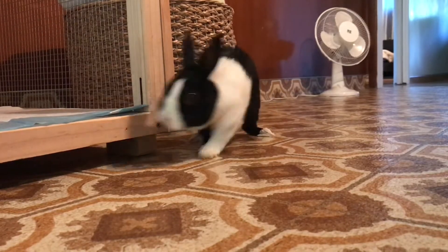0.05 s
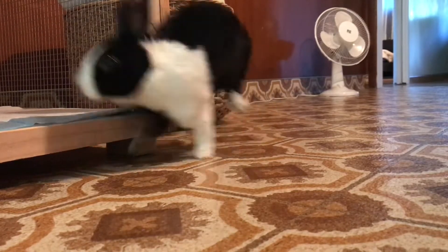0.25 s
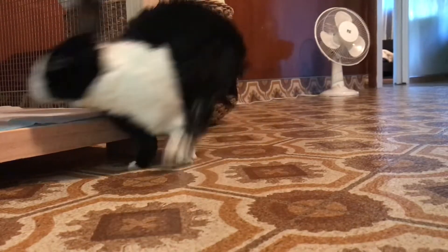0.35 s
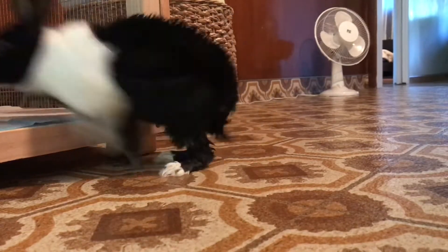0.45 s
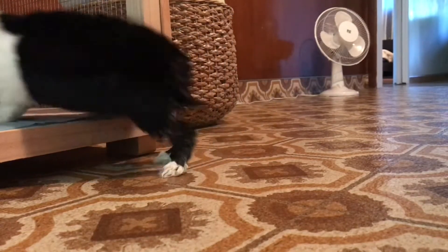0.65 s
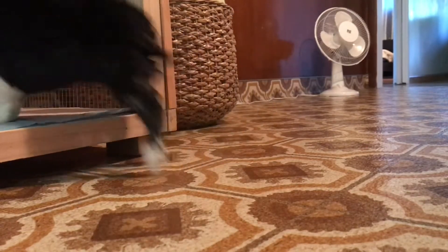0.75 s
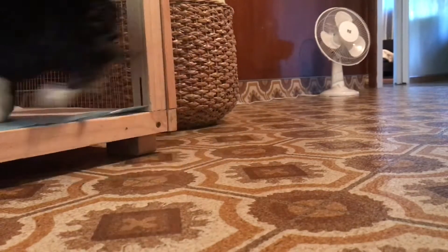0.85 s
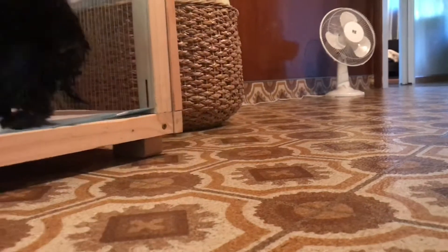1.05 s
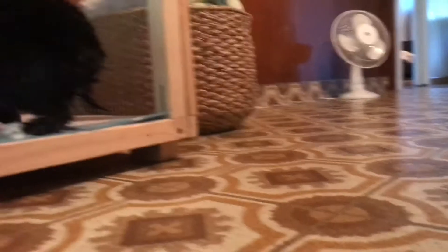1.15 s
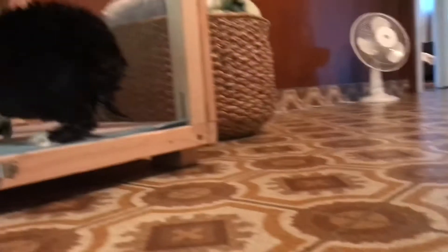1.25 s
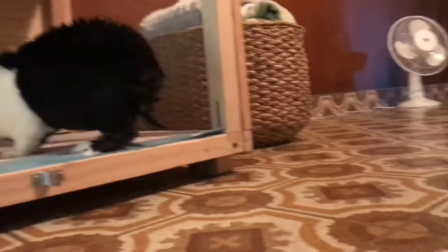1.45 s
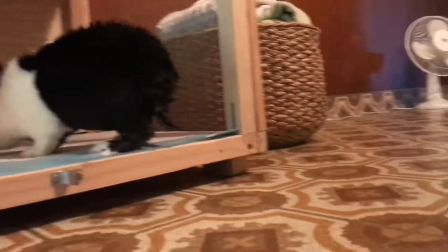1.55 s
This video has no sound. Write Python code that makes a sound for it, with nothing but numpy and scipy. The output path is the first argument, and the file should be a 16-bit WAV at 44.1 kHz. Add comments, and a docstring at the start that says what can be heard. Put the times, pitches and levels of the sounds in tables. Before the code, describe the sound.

Rabbit claws on hard tile, heard close in a small reflective room: faint scrapes at first, a crisp tick at 0.2 seconds, and the loudest bright crack at 0.3. Lighter ticks, scrapes and soft low paw thumps continue to 0.7. A clustered woody knock on the pen comes near 0.87, then smaller knocks around 1.26-1.3, fading into quiet hiss, rumble and faint hum.

```python
"""A rabbit's claws tick and scrape on hard tiles, close to the microphone, as it hops into its wooden pen.
Ticks, scrapes and the loudest strike's bright grit are short noise contacts with a claw-on-tile spectrum;
ticks add a brief ring. Feet knock the pen's frame, exciting dry wood and decaying modes; soft pads land as
swelling low sines with a dull patter. A small live room answers claws and knocks with reflections and a tail.
Below lie shaped-noise hiss and rumble that ease off, and a faint wavering hum that grows."""
import sys
import numpy as np
from scipy import signal
from scipy.fft import rfft, irfft
from scipy.io import wavfile

SR = 44100
rng = np.random.default_rng(int(sys.argv[2]) if len(sys.argv) > 2 else 0)


def transcribe(signal):
    """Save signal, clipped to [-1, 1], as a 16-bit WAV file at the path in sys.argv[1]."""
    frames = np.atleast_2d(signal).T
    limited = np.clip(frames, -1, 1)
    pcm = np.round(limited * 32767).astype(np.int16)
    wavfile.write(sys.argv[1], SR, pcm)


N = 70560  # length in samples

# Claw strikes on tile: start_s, level_db, contact_s, brightness_db_per_octave, room_send_db
CLAW_TICKS = [(.1782, -29, 0.00022, -11, 3), (0.2197, -16, 0.00072, -4.5, -5),
              (0.2206, -14.5, 0.00018, 4.5, 0.5), (0.3043, 1.5, 0.00021, -3.5, -0.5),
              (0.3558, -17, 0.000057, -3.5, -0.5), (.4280, -28, .0004, -11, 1),
              (0.611, -31, 0.00019, 1.5, 2.5), (1.311, -37, .0008, 7, 5), (1.3585, -37.5, 0.0016, 9, -1)]
# Claws dragging on tile, the bright grit of the loudest strike, and a brief rustle of fur near 0.7 s: #
# start_s, level_db, length_s, brightness_db_per_octave, rasp_hz, room_send_db
SCRAPES_GRIT_AND_RUSTLE = [(.002, -31, 0.028, 5.5, 4300, 4), (0.142, -30.5, 0.02, 4, 2760, 10.5),
                           (0.2208, -15.5, 0.0076, 2.5, 6360, -3), (0.241, -32, 0.014, -5, 6100, -3),
                           (0.3011, -8.5, 0.0024, .5, 1900, 2), (0.3052, -14.5, 0.004, 3.5, 8500, 8),
                           (0.411, -27, 0.019, 3.5, 12900, 7), (0.4736, -18.5, 0.01, 0, 7750, 1),
                           (.504, -30.5, 0.013, 1.5, 12030, -14), (0.612, -31.5, 0.012, 1.5, 4560, 4.5),
                           (0.675, -27, 0.0075, 4, 3400, -0.5), (0.698, -37, 0.016, 7, 4970, -5),
                           (0.833, -38, 0.028, 6, 2850, -6.5), (0.867, -22, 0.031, -0.5, 12900, 8.5),
                           (1.2568, -29.5, 0.0063, -1.5, 9000, 9), (1.318, -33, 0.023, 3.5, 12800, -2),
                           (1.487, -41, 0.013, 6.5, 12000, -1)]
# Spectrum of claw on tile: frequency_hz, level_db
CLAW_SPECTRUM = [(100, -41.5), (600, -27.5), (850, -30.5), (1300, -23), (1900, -9.5), (2600, -0.5),
                 (3250, -3), (3900, -8.5), (4750, -17), (5400, -11.5), (6250, -13), (7100, -20),
                 (8000, -19.5), (9900, -21.5), (10600, -23.5), (14200, -20.5), (16000, -35)]
# Brief ring within each tick: pitch_hz, level_db, t60_s
CLAW_MODES = [(3260, -25, 0.02), (3390, -36.5, 0.0067), (6100, -41, 0.018)]

# Feet on the pen's frame: start_s, level_db, contact_s, brightness_db_per_octave, spot_hz, ring_db, room_send_db
FRAME_KNOCKS = [(0.1788, -29, 0.0019, -3.5, 400, -4, -1.5), (.3830, -27.5, 0.0041, 3, 1500, -13, 9.5),
                (0.4698, -24.5, 0.01, -2, 400, -2.5, 8), (.6122, -24, 0.00043, -2, 1430, -17, 2.5),
                (.8692, -17.5, 0.00452, 1, 2300, -2.5, 4), (0.8725, -17, 0.0045, 2.3, 4430, -5.5, -0.5),
                (0.8777, -22.5, 0.0073, -1.5, 660, -5.5, -3), (0.8895, -24.5, 0.0065, 0, 700, -10, -8),
                (0.911, -29.5, 0.0067, -3, 2300, -8, 2), (0.938, -37, .012, 4, 2000, -4, -1),
                (1.139, -36.5, 0.0033, -6.5, 500, -4, -7), (1.258, -25, 0.0098, -1.5, 1000, -6, 5),
                (1.2962, -18.5, 0.002, -5.5, 710, -18, -10)]
# Spectrum of the frame's dry knock: frequency_hz, level_db
WOOD_SPECTRUM = [(60, -16), (300, 3), (700, 0.5), (1100, 2.5), (2200, 1.5), (3200, -11), (4400, -3),
                 (6200, -6.5), (8000, -19), (16000, -35)]
# Ringing modes of the frame: pitch_hz, level_db, t60_s
FRAME_MODES = [(415, -5.5, .11), (619, -8, 0.048), (657.5, 1, 0.13), (933.7, -4, 0.13), (1075, -6.5, 0.068),
               (1323, -5, 0.11), (1590, -5.5, .09), (1690, -2, .08), (2114, -13, .07), (2467, -13.5, .09),
               (4230, -1.5, 0.019), (5300, -16.5, .06), (5870, -21, .06)]
FRAME_RING_DB = -30  # each knock's ring_db adds to this
SPOT_DB, SPOT_OCTAVES = 6.5, 0.42  # lift and width of the peak at a rasp or spot pitch

# Soft pads landing: start_s, level_db, pitch_hz, rise_s, t60_s
PAD_THUMPS = [(.003, -41, 55.6, 0.013, 0.067), (0.147, -47, 58, 0.008, 0.11),
              (.245, -39, 48.7, 0.015, 0.47), (0.302, -38.5, 185.6, 0.011, 0.13),
              (.305, -45, 81, 0.022, 0.19), (.365, -37, 47.6, .015, 0.15), (.420, -39.5, 50.8, .02, 0.9),
              (0.496, -32, 95.4, .04, 0.18), (0.554, -37.5, 126, 0.0097, 0.083),
              (.570, -40, 48.8, .015, 0.28), (.660, -47.5, 203.3, 0.018, 0.2),
              (0.734, -44.5, 66, 0.0082, 0.25), (0.904, -40, 91.9, 0.015, 0.27),
              (0.938, -38.5, 55.8, 0.018, .25), (1.010, -43, 52, 0.015, .15),
              (1.024, -46.5, 146, 0.0093, 0.094), (1.315, -45, 65.6, 0.0059, .12),
              (1.335, -50.5, 169.8, 0.011, 0.17)]
# Spectrum of the pads' dull patter: frequency_hz, level_db
PAD_SPECTRUM = [(25, -36), (50, -1.5), (110, 2), (200, -1), (300, -12.5), (600, -22.5), (2000, -45)]
PATTER_DB = -11  # patter noise against the boom

# Room decay by band: centre_hz, t60_s
ROOM_DECAY = [(200, 0.77), (900, 0.43), (3200, 0.3657), (6000, 0.4), (14000, 0.27)]
# Colour of the room's tail: frequency_hz, level_db
ROOM_SPECTRUM = [(100, 2), (1000, 0.5), (1800, -1), (2300, -4), (2900, -2), (3550, 0.5), (4400, 2),
                 (6000, 1), (9000, 2), (15000, 1.5)]
TAIL_DB, TAIL_ONSET_S = -7.5, 0.0026
EARLY_DB, EARLY_PEAK_S = -14.5, 0.0027

# Spectrum of the room hiss, before its gentle low cut: frequency_hz, level_db
HISS_SPECTRUM = [(220, -33), (380, -1.5), (865, -4.5), (1200, -6.5), (1770, -11.5), (1910, -11),
                 (15500, -27.5)]
HISS_DB, HISS_FALL_DB_PER_S = -61.5, 3.5
# Spectrum of the low rumble: frequency_hz, level_db
RUMBLE_SPECTRUM = [(20, -24.5), (32, -22.5), (48, 6), (70, -2.5), (100, -3), (150, -4), (210, -6.5),
                   (280, -17), (340, -14), (420, -26), (700, -44)]
RUMBLE_DB, RUMBLE_FALL_DB_PER_S = -48.5, 3
# Faint hum, levels at the start: pitch_hz, level_db
HUM_TONES = [(721, -86), (1227, -82), (1556, -87.5), (1846, -88.5)]
HUM_WIDTH_HZ, HUM_RISE_DB_PER_S = 9, 4

LOW_CUT_HZ, TOP_HZ = 36, 15900  # the microphone's band edges


def undb(db):
    """Decibels to gain."""
    return 10 ** (np.asarray(db) / 20)


def unit(x):
    """Scale to an energy of one."""
    return x / np.sqrt(np.sum(x ** 2) + 1e-18)


def on_log_axis(points, hz):
    """Join (Hz, value) points by straight lines over log frequency."""
    p = np.array(points, float)
    return np.interp(np.log(np.maximum(hz, 1)), np.log(p[:, 0]), p[:, 1])


def response(points, tilt_db=0, spot_hz=None, size=8192):
    """Minimum-phase impulse response of unit energy: a spectrum, tilted above 400 Hz, lifted at one spot."""
    hz = np.maximum(np.fft.rfftfreq(size, 1 / SR), 10)
    db = on_log_axis(points, hz) + tilt_db * np.log2(np.maximum(hz, 400))
    if spot_hz:
        octaves_away = np.log2(hz / spot_hz)
        db = db + SPOT_DB * np.exp(-(octaves_away / SPOT_OCTAVES) ** 2)
    # folding the cepstrum onto positive time puts the energy up front
    cepstrum = irfft(db * np.log(10) / 20)
    cepstrum[1:size // 2] *= 2
    cepstrum[size // 2 + 1:] = 0
    return unit(irfft(np.exp(rfft(cepstrum))))


def through(x, ir):
    """Pass a sound through an impulse response, keeping its length."""
    return signal.fftconvolve(x, ir)[:len(x)]


def add(out, start_s, x):
    """Mix x into out from a start time."""
    i = max(int(start_s * SR), 0)
    out[i:i + len(x)] += x[:N - i]


def even_noise(shape, count=4):
    """Unit-energy noise under an envelope, repeatedly flattened so that it favours almost no frequency."""
    x = rng.standard_normal(len(shape)) * shape
    for _ in range(count):
        flat = irfft(np.exp(1j * np.angle(rfft(x))))
        x = flat * np.sqrt(shape / shape.max())
    return unit(x)


def contact(length_s, size=4096):
    """A run of tiny slips, as noise that dies away over the contact."""
    t = np.arange(size) / SR
    return even_noise(np.exp(-(t / length_s) ** 2))


def ringing(modes):
    """The modes of a struck object, as exponentially decaying sines."""
    t = np.arange(SR // 2) / SR
    return sum(undb(db - 60 * t / t60) * np.sin(2 * np.pi * hz * t) for hz, db, t60 in modes)


def claws():
    """Strikes excite a brief ring; scrapes and grit are noise peaked at one pitch; returns direct and send."""
    direct, send = np.zeros(N), np.zeros(N)
    for start_s, level_db, contact_s, tilt_db, room_db in CLAW_TICKS:
        body = ringing(CLAW_MODES)
        add(body, 0, response(CLAW_SPECTRUM, tilt_db))
        tick = undb(level_db) * unit(through(body, contact(contact_s)))
        add(direct, start_s, tick)
        add(send, start_s, tick * undb(room_db))
    for start_s, level_db, length_s, tilt_db, rasp_hz, room_db in SCRAPES_GRIT_AND_RUSTLE:
        rasp = response(CLAW_SPECTRUM, tilt_db, rasp_hz)
        rough = undb(level_db) * unit(through(contact(length_s), rasp))
        add(direct, start_s, rough)
        add(send, start_s, rough * undb(room_db))
    return direct, send


def frame_knocks():
    """Foot contacts excite the frame's dry wood and brief modes; returns direct sound and room send."""
    direct, send = np.zeros(N), np.zeros(N)
    ring = ringing(FRAME_MODES)
    for start_s, level_db, contact_s, tilt_db, spot_hz, ring_db, room_db in FRAME_KNOCKS:
        body = undb(FRAME_RING_DB + ring_db) * ring
        add(body, 0, response(WOOD_SPECTRUM, tilt_db, spot_hz))
        knock = undb(level_db) * through(body, contact(contact_s))
        add(direct, start_s, knock)
        add(send, start_s, knock * undb(room_db))
    return direct, send


def pads():
    """Each soft landing swells into a low sine boom with dull noise, then decays exponentially."""
    out = np.zeros(N)
    t = np.arange(SR // 2) / SR
    pad = response(PAD_SPECTRUM)
    for start_s, level_db, pitch_hz, rise_s, t60 in PAD_THUMPS:
        swell = np.sin(np.pi / 2 * np.minimum(t / rise_s, 1))
        decay = undb(-60 * np.maximum(t - rise_s, 0) / t60)
        boom = np.sin(2 * np.pi * pitch_hz * t)
        patter = undb(PATTER_DB) * through(rng.standard_normal(len(t)), pad)
        add(out, start_s, undb(level_db) * swell * decay * (boom + patter))
    return out


def room(x):
    """Quick reflections off floor and pen, then a diffuse noise tail with its own decay in each band."""
    t, hz = np.arange(N) / SR, np.fft.rfftfreq(N, 1 / SR)
    noise = rfft(rng.standard_normal(N))
    colour = undb(on_log_axis(ROOM_SPECTRUM, hz))
    tail = 0
    for centre, t60 in ROOM_DECAY:
        # full weight at this centre, fading to none at its neighbours
        band = on_log_axis([(f, float(f == centre)) for f, _ in ROOM_DECAY], hz)
        tail = tail + irfft(noise * band * colour, N) * undb(-60 * t / t60)
    tail = unit(tail * (1 - np.exp(-t / TAIL_ONSET_S)))
    early = even_noise(t * np.exp(-t / EARLY_PEAK_S), count=2)
    return through(x, undb(TAIL_DB) * tail + undb(EARLY_DB) * early)


def steady_noise(gain):
    """Random-phase noise with a given spectrum and an RMS of one."""
    phase = np.exp(2j * np.pi * rng.random(len(gain)))
    return np.sqrt(N) * unit(irfft(gain * phase, N))


def background():
    """Hiss and rumble of shaped noise ease off; narrow noise bands make a wavering, growing hum."""
    t, hz = np.arange(N) / SR, np.fft.rfftfreq(N, 1 / SR)
    low_cut = hz / np.hypot(hz, 120)
    hiss = steady_noise(undb(on_log_axis(HISS_SPECTRUM, hz)) * low_cut)
    hiss = hiss * undb(HISS_DB - HISS_FALL_DB_PER_S * t)
    rumble = steady_noise(undb(on_log_axis(RUMBLE_SPECTRUM, hz)))
    rumble = rumble * undb(RUMBLE_DB - RUMBLE_FALL_DB_PER_S * t)
    hum = 0
    for pitch_hz, level_db in HUM_TONES:
        narrow_band = 1 / (1 + ((hz - pitch_hz) / HUM_WIDTH_HZ) ** 2)
        hum = hum + undb(level_db) * steady_noise(narrow_band)
    return hiss + rumble + hum * undb(HUM_RISE_DB_PER_S * t)


def scene():
    """Claws and knocks with their room, then dry pads and the background."""
    claw_sound, claw_send = claws()
    knock_sound, knock_send = frame_knocks()
    mix = claw_sound + knock_sound + pads() + room(claw_send + knock_send) + background()
    return mix[None]  # one channel


def record(dry):
    """The microphone drops the deepest bass and cuts the top steeply."""
    low_cut = signal.butter(4, LOW_CUT_HZ, "highpass", fs=SR, output="sos")
    top_cut = signal.ellip(8, .2, 70, TOP_HZ, fs=SR, output="sos")  # ripple and rejection in dB
    return signal.sosfilt(top_cut, signal.sosfilt(low_cut, dry))


dry = scene()
out = record(dry)
transcribe(out)
```